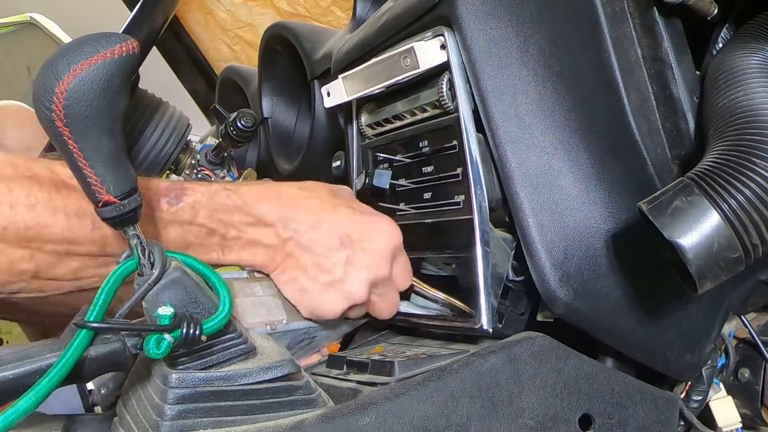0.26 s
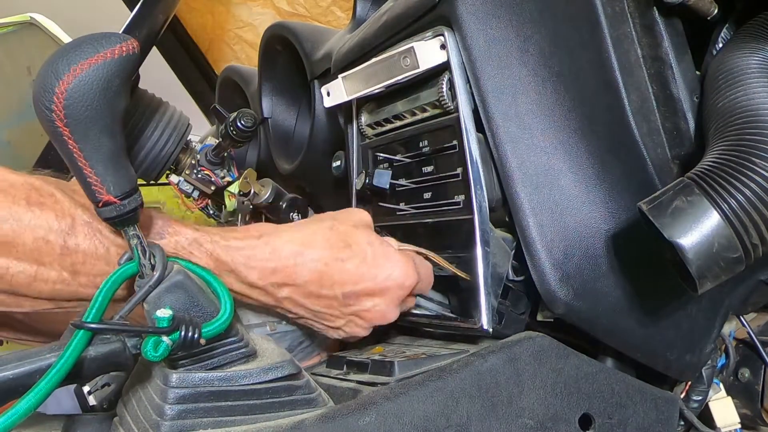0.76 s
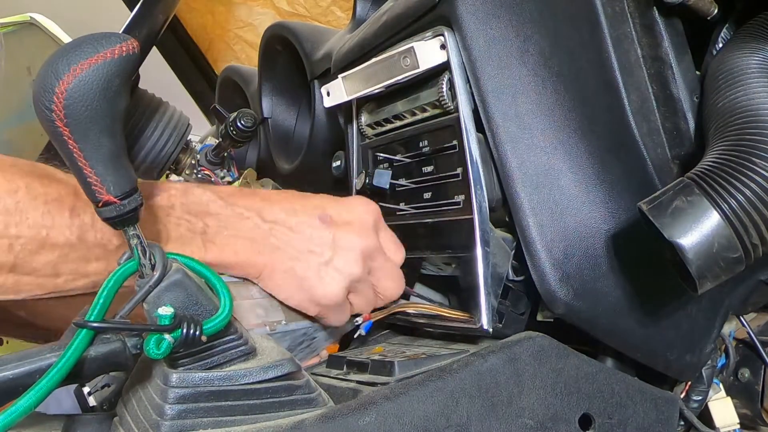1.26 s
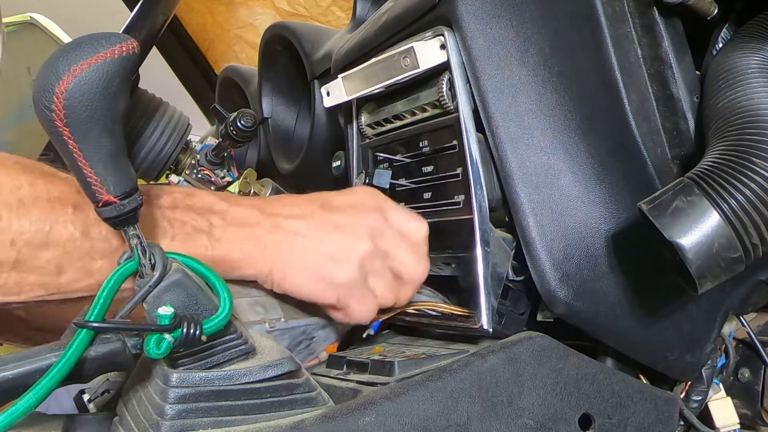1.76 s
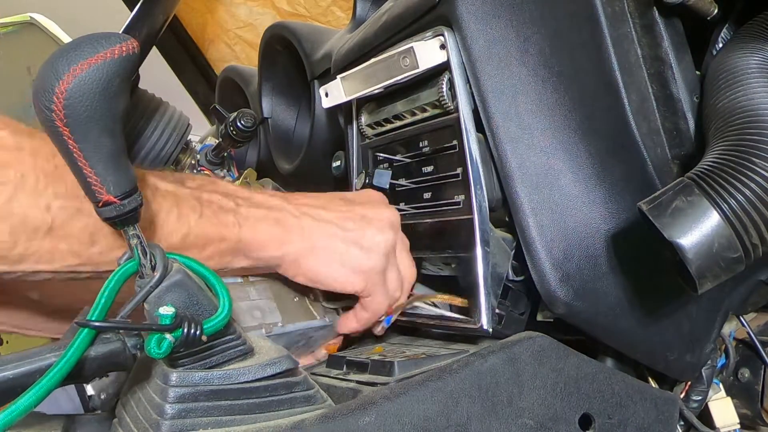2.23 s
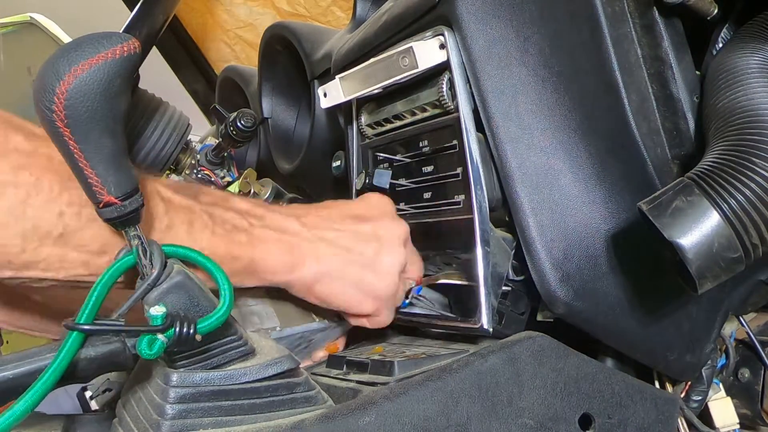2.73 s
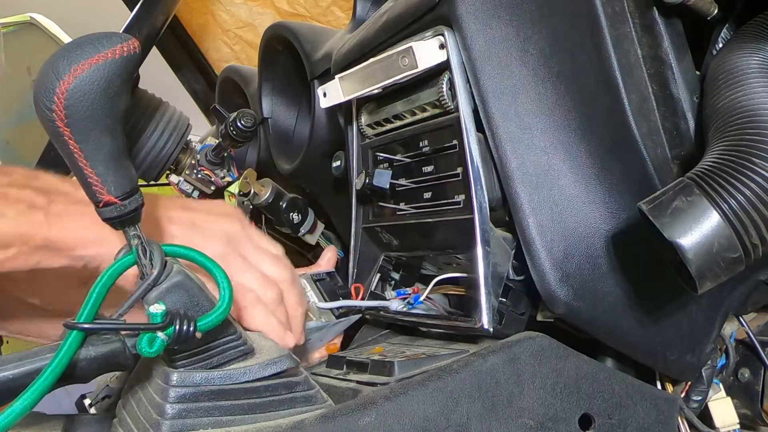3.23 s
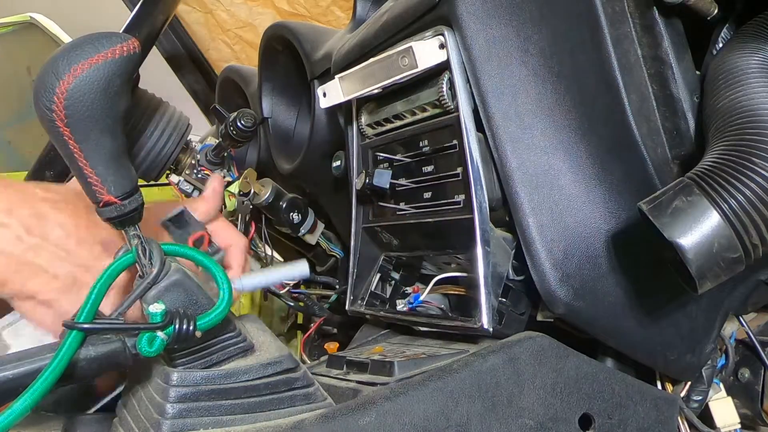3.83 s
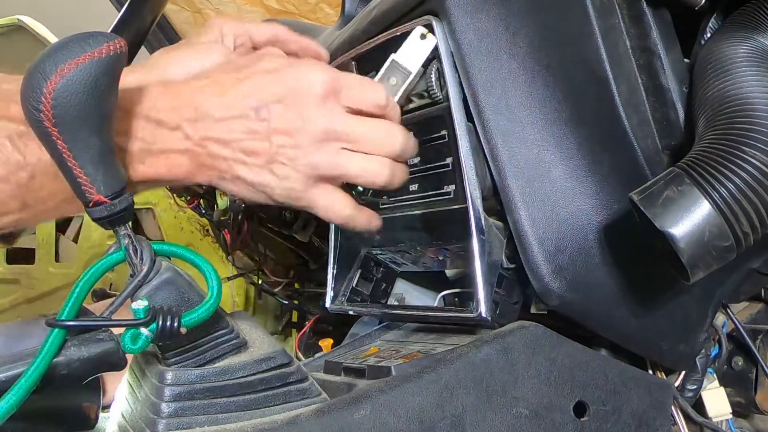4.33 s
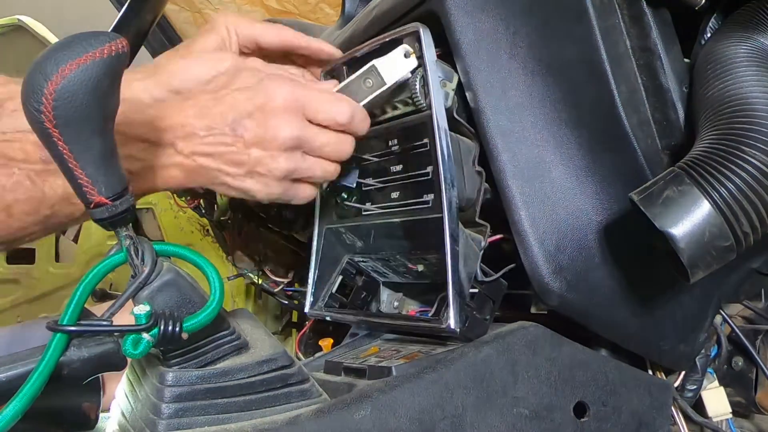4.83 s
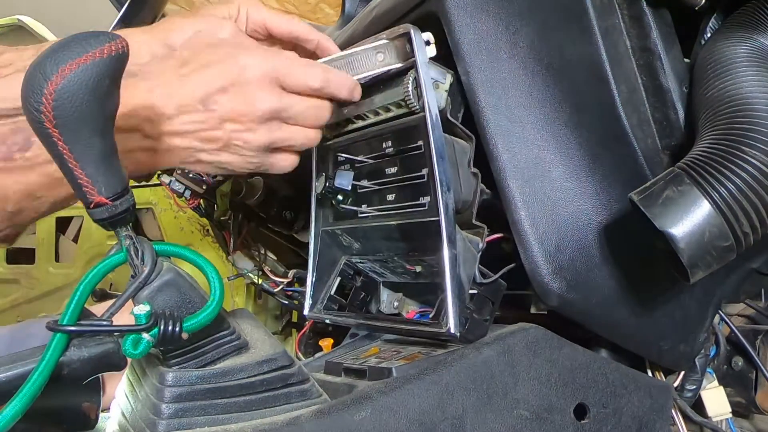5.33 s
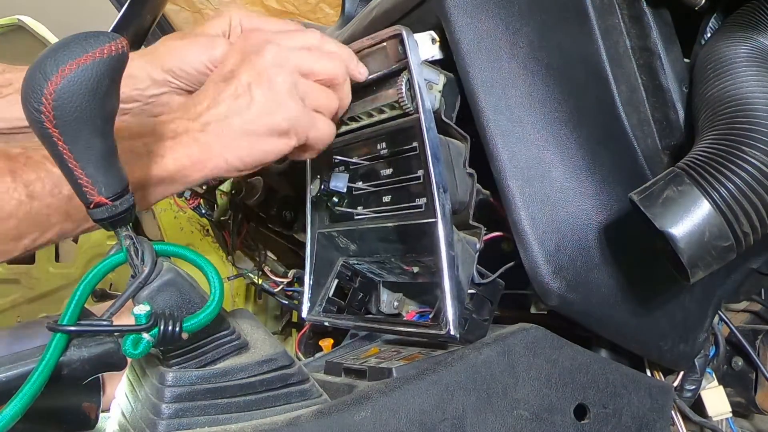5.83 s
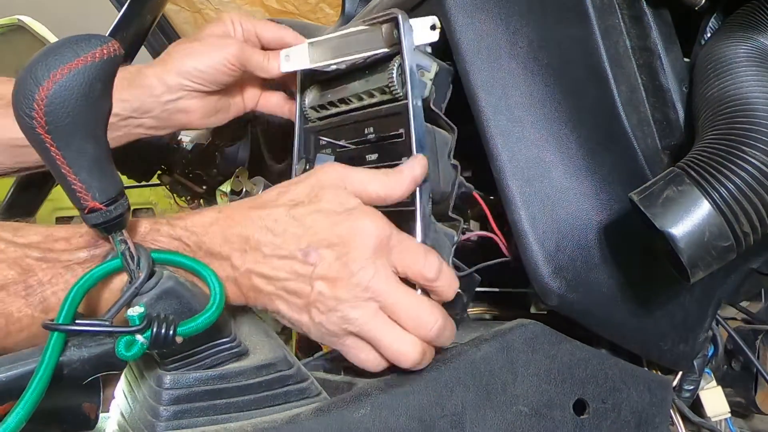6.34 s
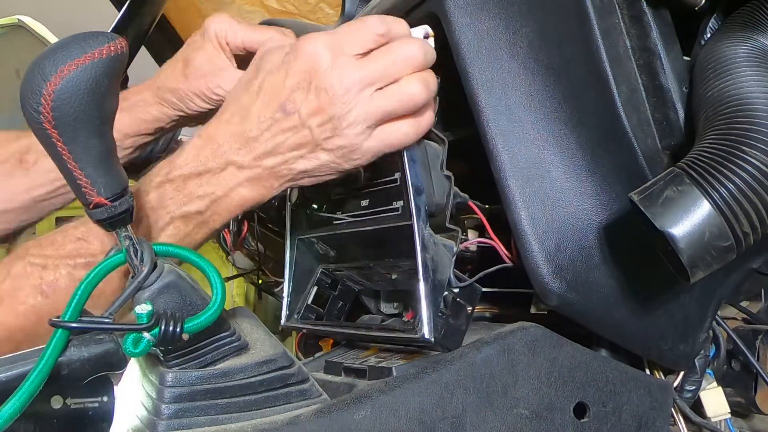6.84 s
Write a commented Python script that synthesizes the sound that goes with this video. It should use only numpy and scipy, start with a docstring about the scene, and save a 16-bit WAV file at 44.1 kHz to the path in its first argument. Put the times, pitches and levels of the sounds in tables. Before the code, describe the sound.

Small plastic and metal pieces tick and snap as someone fiddles with wires and a tool inside a dashboard. The activity thins to faint clicks, then picks up with crisp rattles, tiny ringing squeaks and dull hollow bumps. A short quieter moment follows before a loose plastic panel is shifted, knocked and scraped almost continuously. The microphone is near, in stereo, with short reflections and very faint garage air.

```python
"""Hands work wires, a tool and a loose plastic housing under a car dashboard, close by in a quiet garage.
First brisk clicks and knocks (noise bursts into resonators, dying shell modes), then from 0.6 s sparse, fainter
ones; from 2.6 s a burst of clicks and brief tones (gliding sines), then strong knocks and drags (even noise
drives the shell, random slips the small parts) up to 3.8 s; from 4.4 s dense handling, broken by short rests.
Early reflections, a decaying cabin tail and steady coloured noise for the garage air lie under all of it."""
import sys
import numpy as np
from scipy import signal
from scipy.fft import rfft, irfft, next_fast_len
from scipy.io import wavfile
from scipy.ndimage import uniform_filter1d

SR = 44100
rng = np.random.default_rng(int(sys.argv[2]) if len(sys.argv) > 2 else 0)


def to_wav(s):
    """Save 16-bit WAV."""
    ch = np.atleast_2d(s).T  # columns
    pcm = np.round(np.clip(ch, -1, 1) * 32767)  # PCM
    wavfile.write(sys.argv[1], SR, pcm.astype(np.int16))


N = 312669

# Modes of the hollow dash shell, lower and upper: (frequency [Hz], level [dB], t60 [s])
LOW_SHELL_MODES = [(166.4, -9.5, 0.12), (201.2, -3, 0.087), (227.6, 4.5, 0.14), (253, -1, 0.16),
                   (299.5, -4.5, 0.12)]
UPPER_SHELL_MODES = [(353.5, -7, 0.073), (368.4, -4.5, 0.063), (435, 1.5, 0.033), (519.7, 1.5, 0.02),
                     (666, -4.5, 0.026), (726, -13, 0.047), (830, -11, 0.026), (983, -13, 0.019)]
# Resonances of small plastic and metal parts, one list each for the dull, middle and bright range:
# (frequency [Hz], width [Hz], level [dB])
PART_RESONANCES = [
    [(1380, 670, -6), (1900, 835, 10.5), (2150, 275, -4), (2475, 1150, 14), (3200, 530, -4)],
    [(3800, 1065, 5), (4390, 730, -4.5), (5200, 927, 5), (6220, 1630, 7), (7125, 1550, 10)],
    [(8050, 1640, 7.5), (9370, 1280, 2), (10400, 1640, 8), (12400, 2440, 12.5), (14450, 2270, 11),
     (14970, 1970, 9)],
]


def gain_of(db):
    """Decibel law: amplitude ratio of a level in dB."""
    return 10 ** (np.asarray(db) / 20)


def evened(x):
    """Normalisation by power: scales a signal to rms 1."""
    return x / np.sqrt(np.mean(x ** 2) + 1e-20)


def read(points, hz):
    """Interpolation on a logarithmic frequency axis of a (frequency, value) curve."""
    f, value = np.transpose(points)
    return np.interp(np.log(hz + 1), np.log(f + 1), value)


def add(mix, s, sound):
    """Superposition: adds a sound into the mix from time s [s]."""
    part = mix[max(round(s * SR), 0):][:len(sound)]
    part += sound[:len(part)]


def colour(x, points):
    """Linear filtering: multiplies the spectrum by a (frequency [Hz], gain [dB]) curve."""
    size = next_fast_len(x.shape[-1])
    gain = gain_of(read(points, np.fft.rfftfreq(size, 1 / SR)))
    return irfft(rfft(x, size) * gain, size)[..., :x.shape[-1]]


def rings(modes, t, touch):
    """Modal superposition: exponentially dying sines, each weighted by where the body is struck."""
    hz, db, t60 = np.transpose(modes)[:, :, None]
    decay = gain_of(db - 60 * t / t60)
    return (touch[:, None] * decay * np.sin(2 * np.pi * hz * t)).sum(0)


def part_modes(peaks):
    """Bandwidth and decay: a resonance of width B rings for t60 = ln(1000) / (pi B)."""
    return [(hz, db, np.log(1000) / np.pi / width) for hz, width, db in peaks]


def near(modes, hz, octaves, lift_db):
    """Selective excitation: gain per mode, a bell over log frequency that favours modes close to hz."""
    distance = np.log2(np.array(modes)[:, 0] / hz) / octaves
    return gain_of(lift_db * np.exp(-distance ** 2))


def wander(seconds):
    """Low-pass noise: white noise averaged twice over a window, rms 1."""
    window = int(seconds * SR)
    return evened(uniform_filter1d(uniform_filter1d(rng.standard_normal(N), window), window))


def clicks(build_s=0.0017, spread_db=4.0, shell_db=-12.5, tick_db=-4.5, own_db=(-14., -9., -9.), own_q=7.7):
    """Source and resonator: a sharp tick and edge chatter ring the small parts, each time at another spot."""
    # Hard edges meeting or skidding: (time [s], level [dB], dull range re level [dB], bright range re level [dB],
    # favoured dull frequency [Hz], favoured bright frequency [Hz], chatter t60 [s])
    edge_hits = [(0.014, -43, -7, -25, 1340, 4030, 0.025), (0.0551, -37.5, 0.5, -1, 2300, 3800, 0.034),
                 (0.077, -27, -1, -6, 1960, 6700, 0.024), (0.1, -34.5, -3.5, -8, 1450, 4400, 0.054),
                 (0.1214, -31, -2.5, -7, 1510, 4160, 0.021), (0.175, -28, -7.5, -8.5, 1510, 4100, 0.023),
                 (0.236, -29.5, -5.5, -9, 1870, 4930, 0.016), (0.3477, -40.5, 0, -3, 3180, 4380, 0.045),
                 (0.374, -24.5, -5.5, 1.5, 1740, 5770, 0.023), (0.3853, -30, -1, 1, 2000, 7000, 0.02),
                 (0.395, -28, -1, -4, 2660, 4830, 0.024), (0.5531, -26, -5, -11.5, 1700, 4170, 0.016),
                 (0.8902, -44.5, -2.5, -5, 2270, 6800, 0.011), (0.9172, -46, 3.5, 8.5, 1820, 11300, 0.055),
                 (0.99, -51, -3.5, 1, 1900, 4260, 0.036), (1.059, -44.5, -2.5, 2, 3050, 4170, 0.021),
                 (1.124, -49, -4, -3, 2150, 4930, 0.05), (1.149, -48.5, 6, 1.5, 2190, 7000, 0.015),
                 (1.256, -64, 4, -4.5, 2150, 4230, 0.016), (1.291, -61, 4, -9.5, 2150, 4200, .015),
                 (1.332, -31.5, -17.5, 3, 2300, 6400, 0.035), (1.4269, -37, -14.5, 8.5, 2280, 8300, 0.044),
                 (1.46, -49.5, -1.5, 6, 2250, 4250, 0.039), (1.52, -40.5, -6.5, 2, 3200, 13100, 0.022),
                 (1.5728, -48.5, 0.5, -2, 2200, 6940, 0.013), (1.5884, -43, -6.5, 2, 2130, 5030, 0.058),
                 (1.6154, -45, -3, 9, 3400, 13700, 0.064), (1.716, -44, -2.5, -4, 1880, 6800, 0.039),
                 (1.732, -31, -5.5, -6, 1760, 4860, 0.02), (1.805, -34, -1.5, -3, 3030, 4060, 0.024),
                 (1.82, -37, 0.5, -1, 1760, 4400, 0.02), (1.8382, -31.5, -6, -8, 1750, 4640, 0.018),
                 (1.872, -43, -5, -11, 2150, 6880, 0.017), (1.9104, -26.5, -6, -11.5, 3100, 4770, 0.017),
                 (1.9748, -45.5, 3.5, -2, 3300, 14900, 0.025), (2.1554, -41.5, -39, 2, 3100, 7420, 0.014),
                 (2.1987, -31, -4.5, -4.5, 1800, 4470, 0.044), (2.284, -54, 7, -6, 1960, 4700, 0.013),
                 (2.345, -39.5, -5, 7.5, 3200, 9550, 0.021), (2.407, -44.5, 6, -4, 1850, 4800, 0.017),
                 (2.4541, -29.5, -10, -1.5, 3200, 6700, 0.019), (2.509, -41, 5, 1, 1760, 5200, 0.058),
                 (2.5859, -33.5, 3.5, -1, 1700, 6400, 0.041), (2.598, -33.5, -1, 2, 1700, 9800, 0.019),
                 (2.627, -44, 2, 13, 1580, 9400, 0.018), (2.646, -27.5, -2, 8.5, 3010, 9200, 0.044),
                 (2.6669, -25, -30, 6, 2850, 10400, 0.025), (2.681, -31.5, -9, 6, 2850, 9500, 0.02),
                 (2.699, -34, 0.5, 3, 3420, 12700, 0.035), (2.7267, -36.5, -1.5, 12.5, 3030, 12400, 0.016),
                 (2.759, -39, -4, -1, 1670, 3600, 0.036), (2.7904, -41, 1.5, 1, 1510, 3930, 0.043),
                 (2.812, -43, -2, 3, 1900, 9100, 0.015), (2.846, -41, 3, 0, 3200, 6800, 0.021),
                 (2.8695, -39.5, -10, 3, 2310, 4630, 0.023), (2.884, -39, -2, 0, 2300, 8000, 0.02),
                 (2.897, -35.5, -3, 8, 3100, 12400, 0.023), (2.9118, -36.5, 3, -10, 1850, 6900, 0.019),
                 (2.95, -35.5, -10, -1, 1900, 6500, 0.037), (3.021, -28, -3.5, 8, 1870, 13500, 0.033),
                 (3.092, -45, -4, 3, 3200, 7760, 0.054), (3.129, -41, -19, 3, 3310, 9900, 0.064),
                 (3.163, -30, -2, -2.5, 1420, 9700, 0.047), (3.175, -23.5, -1.5, -8, 2120, 4560, 0.022),
                 (3.205, -36.5, 0, -12, 1580, 4030, 0.035), (3.289, -39, 4, -8, 1430, 3800, 0.04),
                 (3.3358, -35, -2, -34, 1700, 4380, 0.016), (3.357, -32.5, -3, -8, 1980, 6760, 0.024),
                 (3.37, -33.5, 2, -2, 1710, 4360, 0.022), (3.466, -35, 0, 2.5, 3540, 3520, 0.065),
                 (3.5677, -26, 7, -1, 1760, 3600, 0.0096), (3.599, -26.5, -12.5, 5, 1290, 6700, 0.039),
                 (3.74, -35.5, -5, -11, 2000, 4390, 0.018), (3.754, -29, -1, -4, 1380, 8050, 0.025),
                 (3.8081, -34.5, 1, -1.5, 1950, 4000, 0.025), (3.915, -32, -5.5, -7, 1440, 4570, 0.021),
                 (4.025, -47.5, -30, 9, 2620, 13600, 0.059), (4.084, -52, -3, 4, 2500, 7090, 0.036),
                 (4.1378, -33.5, -0.5, -6, 1430, 4400, 0.017), (4.375, -46, -1, 7, 2000, 12000, 0.016),
                 (4.4315, -48, 1.5, 1, 2100, 9500, 0.023), (4.524, -44.5, 8, -1, 1940, 6500, 0.052),
                 (4.5542, -31.5, 9, 4, 1780, 10000, 0.068), (4.589, -34, 5, 5.5, 2320, 4800, 0.041),
                 (4.612, -39.5, 3.5, 6, 1530, 4350, 0.03), (4.667, -32, 2, 4.5, 1640, 3500, 0.044),
                 (4.7, -26, -1, -0.5, 2010, 3760, 0.025), (4.7324, -35, -1, 5, 3020, 8600, 0.015),
                 (4.7609, -35, 6, 3.5, 1800, 7500, 0.038), (4.809, -38, -7, 1, 2720, 5900, 0.025),
                 (4.824, -39, -5.5, -3, 2680, 7800, 0.029), (4.888, -41.5, 0, 1.5, 2100, 3800, 0.054),
                 (4.9149, -26.5, 0.5, -10, 2060, 6470, 0.026), (4.972, -32.5, -4.5, -7, 1900, 3520, 0.02),
                 (5.003, -38.5, -1.5, 2, 3400, 7950, 0.029), (5.0397, -45.5, -11, -7, 3200, 7160, 0.055),
                 (5.15, -19.5, -16, 2.5, 1800, 6680, 0.025), (5.18, -43, 3, 1, 2050, 5200, 0.047),
                 (5.208, -48, -9, 7, 2160, 8550, 0.026), (5.2808, -47.5, 10.5, 11, 2150, 8500, 0.037),
                 (5.294, -42.5, -4, 7.5, 2150, 9900, 0.03), (5.342, -46, 6.5, -18, 2800, 5170, 0.043),
                 (5.393, -44.5, -6, 4, 2000, 9500, 0.051), (5.4145, -27, 1, 0.5, 2250, 5570, 0.021),
                 (5.519, -46, 5, -1.5, 2420, 5220, 0.053), (5.5338, -26.5, -3.5, -1.5, 3400, 4700, 0.025),
                 (5.599, -53, 7.5, -5, 1970, 11000, 0.024), (5.6284, -41, 2, -3, 2130, 5700, 0.046),
                 (5.6498, -25.5, 3.5, 2.5, 2640, 4450, 0.02), (5.7482, -36, -11, -14, 1870, 4260, 0.021),
                 (5.795, -26.5, -10.5, 4, 2070, 11400, 0.023), (5.8716, -42, -11, 1.5, 1840, 9400, 0.033),
                 (5.892, -34.5, -4, -6.5, 1840, 4220, 0.057), (5.992, -42, -2.5, -1, 2150, 3530, 0.02),
                 (6.022, -46.5, 6, 1.5, 1840, 4560, 0.038), (6.129, -35.5, 1.5, 1, 2620, 9100, 0.03),
                 (6.189, -36.5, 0.5, 1.5, 2550, 8100, 0.052), (6.245, -32, 0, -6.5, 1900, 3500, 0.044),
                 (6.2841, -39, 3, -7, 1900, 3700, 0.054), (6.2992, -27.5, -2.5, -4.5, 2950, 5800, 0.035),
                 (6.316, -34, 4, -3, 2530, 4500, 0.029), (6.3592, -40, 2, -23, 1900, 6100, 0.02),
                 (6.3704, -29.5, 1, 5.5, 2010, 8500, 0.045), (6.418, -40, 2, -2, 2860, 5750, 0.027),
                 (6.48, -33, -7, 1, 3200, 4970, 0.01), (6.484, -25, -23, -4, 3420, 3930, 0.012),
                 (6.502, -41, -9.5, 6, 2500, 7800, 0.016), (6.511, -40, 5, -14, 3000, 4000, 0.012),
                 (6.5212, -31.5, -6, 2, 3180, 7500, 0.0075), (6.558, -34.5, -1, 3, 1900, 7600, 0.043),
                 (6.783, -35.5, 4, -14, 2010, 4100, 0.019), (6.812, -32.5, 0.5, -1, 1380, 4100, 0.025),
                 (6.84, -34.5, -0.5, -2, 1380, 5200, 0.032), (6.931, -40.5, 5, 0, 2170, 4900, 0.069),
                 (6.9692, -35.5, -7, -0.5, 2350, 4200, 0.023), (6.99, -37.5, 0, -4, 3280, 4000, 0.035),
                 (7.0312, -29, -8, -11, 1380, 4040, 0.024), (7.047, -39, 1, -3, 2390, 4770, 0.025)]
    # Short swishes of a part dragged past an edge: the columns of edge_hits, then (hold [s])
    strokes = [(3.918, -40.5, -25, -3.5, 1420, 6296, 0.023, 0.038),
               (4.107, -30.5, -8, -2.5, 1730, 4350, 0.032, 0.021),
               (4.344, -36.5, -1.5, 0, 2590, 6360, 0.033, 0.016)]
    contacts = [(*row, 0) for row in edge_hits] + [*strokes]
    out, t, short = np.zeros(N), np.arange(4000) / SR, np.arange(700) / SR
    chatter = rng.standard_normal((len(contacts), len(t)))
    spot = rng.standard_normal((len(contacts), 3, 8))
    grain_db = 12 * uniform_filter1d(rng.standard_normal(chatter.shape), 24) - 1
    chatter = chatter * gain_of(grain_db)  # the chatter comes in grains
    shell = np.minimum(t / 0.0024, 1) * rings(UPPER_SHELL_MODES, t, np.ones(len(UPPER_SHELL_MODES)))
    shell /= np.linalg.norm(shell)
    for contact, noise, spots in zip(contacts, chatter, spot):
        s, db, dull_db, bright_db, dull_hz, bright_hz, t60, held = contact
        t60 = np.clip(t60, .004, .09)
        build = build_s + held / 4 + 0.14 * max(t60 - .035, 0)  # a long skid swells in
        squareness = 1 + t60 / 0.071  # a long skid holds its level, then stops
        shape = np.sin(np.pi / 2 * np.minimum(t / build, 1))
        shape *= gain_of(-60 * (np.maximum(t - build_s - held, 0) / t60) ** squareness)
        if held == 0:  # strokes have no tick
            shape *= 1 + gain_of(tick_db - 60 * abs(t - build_s) / 0.0058)
        burst = noise * shape
        ranges = zip(PART_RESONANCES, (dull_db, 0, bright_db), (dull_hz, bright_hz, bright_hz), spots, own_db)
        for peaks, part_db, hz, touch, ring_db in ranges:
            peaks = [*peaks, (hz, hz / own_q, ring_db)]  # the piece that is struck adds its own ring
            touch = gain_of(spread_db * touch[:len(peaks)]) * near(peaks, hz, 0.16, lift_db=7.5)
            touch = touch * (-1.) ** np.arange(len(peaks))  # listed neighbours in opposite sign
            ring = short * rings(part_modes(peaks), short, touch)  # the ramp gives a soft start
            ring /= np.linalg.norm(ring)
            add(out, s - .001, gain_of(db + part_db) * signal.fftconvolve(burst, ring))
        passed_on = signal.fftconvolve(burst, shell)  # what reaches the dash shell
        add(out, s, gain_of(db + dull_db + shell_db) * passed_on)
    return out


def knocks(blow_s=0.0082, free_s=.042):
    """Impact excitation: a blow of some ms rings the shell modes until a hand stills them after free_s."""
    # Knocks into the shell: (time [s], level [dB], upper modes re level [dB], favoured frequency [Hz])
    blows = [(0.093, -33, -12, 242.4), (.38, -34.5, 1.5, 266), (.399, -28, 2.5, 272.6),
             (.497, -38.5, 2.5, 318), (.543, -50, 17.5, 253), (.938, -36, 0.5, 237.5),
             (0.959, -53, 16.5, 360), (1.025, -66, 16, 446), (1.15, -63.5, 19, 464),
             (1.202, -64.5, 14, 472), (1.465, -61, 14.5, 447), (1.539, -49, 0, 226),
             (1.623, -40, -0.5, 241.5), (1.738, -32, -5, 244), (1.828, -39.5, 2, 226),
             (1.972, -52.5, 17, 345), (2.2, -40.5, 5, 260), (2.25, -37.5, 2, 242.5),
             (2.414, -41, -4.5, 194), (2.491, -45, 8.5, 256), (2.529, -34.5, 0, 222), (2.6, -31, -0.5, 243),
             (2.653, -34.5, 5, 242), (2.857, -33.5, -10, 225), (2.895, -36, 2.5, 193),
             (3.03, -28, 3.5, 276), (3.172, -30, 9, 186), (3.304, -28, -1, 238), (3.378, -25.5, -9, 223),
             (3.477, -21, -5.5, 243), (3.513, -24.5, -12, 247), (3.58, -24, -5, 281),
             (3.639, -38.5, 9, 242), (3.758, -12.5, -9, 228), (3.914, -44, 7.5, 314), (4.292, -58, 17, 520),
             (4.373, -39.5, 5.5, 317), (4.525, -33.5, -3, 229), (4.68, -18.5, -9, 228),
             (4.766, -41.5, 3.5, 223), (4.799, -34, -8, 238), (4.94, -42, -6, 228), (5.16, -21, -8.5, 227),
             (5.204, -36.5, -16, 230), (5.292, -34.5, -8, 238), (5.308, -26, -18, 226),
             (5.351, -23.5, -9, 229), (5.402, -26.5, -9, 228), (5.531, -24.5, -19, 254),
             (5.56, -25, -21, 237), (5.639, -29.5, 3.5, 227), (5.713, -27, -9, 227),
             (5.771, -35.5, -0.5, 231), (5.798, -22.5, -10, 226), (5.917, -35, -7, 211),
             (6.119, -38, -12, 229), (6.219, -25.5, -1, 240.7), (6.24, -23, -8, 224), (6.266, -33, 9, 238),
             (6.306, -27.5, 4, 200), (6.355, -25.5, 2, 226), (6.385, -27.5, 9.5, 352),
             (6.43, -31.5, 10.5, 350), (6.563, -25.5, -21, 227), (6.606, -36, 1.5, 254),
             (6.666, -32.5, -3, 227), (6.754, -38.5, 0.5, 171), (6.811, -42, 9, 193), (6.903, -33, -3, 200),
             (6.998, -37, 4, 227), (7.055, -30.5, 2.5, 229)]
    # Sharp thumps, three deep ones near 86 Hz and one hard knock of two beating tones:
    # (time [s], level [dB], frequency [Hz])
    thumps = [(2.669, -42, 85), (3.173, -36, 86), (3.751, -35, 87.4), (4.146, -26.5, 273),
              (4.148, -37, 218)]
    out, t = np.zeros(N), np.arange(7000) / SR
    swell = 1 - np.exp(-(t / blow_s) ** 2)
    swell *= gain_of(-60 * np.maximum(t - free_s, 0) / 0.034)
    spot = gain_of(3 * rng.standard_normal((len(blows), 8)))
    for (s, db, upper_db, hz), touch in zip(blows, spot):
        low_touch = near(LOW_SHELL_MODES, hz, 0.086, lift_db=20.0)
        upper_touch = touch[:len(UPPER_SHELL_MODES)] * near(UPPER_SHELL_MODES, hz, 0.097, lift_db=15.5)
        for modes, part_db, weights in ((LOW_SHELL_MODES, 0, low_touch), (UPPER_SHELL_MODES, upper_db, upper_touch)):
            sound = swell * rings(modes, t, weights)
            add(out, s - .008, gain_of(db + part_db) * sound / abs(sound).max())
    out = stilled(out)
    for s, db, hz in thumps:
        add(out, s, gain_of(db - 60 * t / 0.12) * np.sin(2 * np.pi * hz * t))
    return out


def singing(rough=0.51, cycles=5, skew=0.68):
    """Single-mode tone: a gliding sine swells and fades, its two quadratures unsteady over a few cycles."""
    # Brief tones: small parts sing as they are struck, bent or skid, and the shell rings after knocks:
    # (time [s], level [dB], first frequency [Hz], last frequency [Hz], length [s])
    tones = [(0.188, -55, 596, 580, .045), (0.233, -30.5, 1900, 1900, 0.0086),
             (0.262, -52, 4300, 4530, 0.1), (2.666, -29.5, 312, 292, 0.053), (3.018, -30, 594, 327, 0.042),
             (3.021, -33, 1810, 1800, 0.011), (3.177, -19, 420, 380, 0.0097), (3.184, -26, 235, 250, .055),
             (3.547, -27, 1930, 1850, .016), (3.562, -12.5, 1770, 1680, 0.012),
             (3.566, -32, 734, 710, 0.025), (4.109, -29, 1843, 1650, 0.02),
             (4.11, -28.5, 4410, 4220, 0.017), (4.108, -33.5, 3160, 2790, .02),
             (4.124, -40, 1516, 1270, .024), (5.412, -22, 2450, 2350, .01), (5.531, -26, 5250, 5270, 0.011),
             (5.63, -34, 2040, 2000, 0.017), (5.63, -41, 2820, 2780, .016), (5.65, -26, 4320, 4240, 0.0073),
             (6.242, -32, 1855, 1900, 0.015), (6.283, -38, 1900, 1900, 0.012),
             (6.368, -27, 2020, 1880, .016), (6.412, -16, 230, 224, .055), (6.415, -31, 2770, 2750, 0.019),
             (6.424, -32, 2150, 2130, 0.01), (6.483, -24, 4350, 4320, 0.0042),
             (6.521, -32.5, 3270, 3200, 0.0087), (6.534, -39, 3260, 3250, .022),
             (6.562, -39, 1890, 1880, 0.041), (6.571, -36, 3320, 3100, 0.025),
             (7.044, -41.5, 756, 730, 0.018), (7.045, -44, 1130, 1100, 0.012)]
    out = np.zeros(N)
    for (s, db, first_hz, last_hz, length), noise in zip(tones, rng.standard_normal((len(tones), 2, 6000))):
        u = np.arange(0, length, 1 / SR) / length
        smooth = uniform_filter1d(uniform_filter1d(noise, int(cycles * SR / first_hz)), int(SR / first_hz))
        a, b = rough * evened(smooth)[:, :len(u)]
        angle = 2 * np.pi * np.cumsum(first_hz + (last_hz - first_hz) * u) / SR
        swell = np.sin(np.pi * u ** skew) ** 2
        add(out, s, gain_of(db) * swell * ((1 + a) * np.sin(angle) + b * np.cos(angle)))
    return out


def sliding(slips_per_s=1100, size_db=4.2):
    """Friction: an even noisy rub drives the shell, tiny uneven slips the small parts; the contact roams."""
    t, out = np.arange(N) / SR, np.zeros((4, N))
    dull, middle, bright = PART_RESONANCES
    bodies = (LOW_SHELL_MODES, UPPER_SHELL_MODES, part_modes([*middle, *bright]), part_modes(dull))
    slips = gain_of(size_db * np.minimum(rng.exponential(1, N), 5)) * (rng.random(N) < slips_per_s / SR)
    slips = slips * rng.choice([-1., 1.], N) + 0.31 * rng.standard_normal(N)
    drive = evened(slips * gain_of(3.5 * wander(.005)))  # the grip catches and lets go
    rub = evened(rng.standard_normal(N) * gain_of(2 * wander(.008)))
    roam = gain_of(2.5 * wander(.03))
    roam_rms = np.sqrt(np.mean(roam ** 2))
    body_efforts = np.repeat(efforts(t[::32]), 32, axis=1)[:, :N]
    for body, force, effort, modes in zip(out, (rub, rub, drive, drive), body_efforts, bodies):
        push = force * effort / roam_rms
        # two cycles of build-up, at the body's first mode, keep the skirts steep
        soft = np.minimum(t[:5000] * modes[0][0] / 2, 1)
        size = np.linalg.norm(soft * rings(modes, t[:5000], np.ones(len(modes))))
        for k, mode in enumerate(modes):
            # neighbours move in opposition
            ring = soft * rings([mode], t[:5000], np.ones(1)) * (-1) ** k / size
            # a time shift of its own lets each mode come and go
            body += signal.oaconvolve(push * np.roll(roam, rng.integers(N)), ring)[:N]
    low_shell, upper_shell, bright_parts, dull_parts = out
    return stilled(low_shell + upper_shell) + bright_parts + dull_parts


def efforts(t):
    """Addition of powers: fumbling plus shoves, as gains on low shell, upper shell, bright and dull parts."""
    # Light fumbling, before each body's share: (time [s], shell level [dB], small parts level [dB])
    fumbling = [(0.0, -59, -59), (0.407, -77, -60.5), (0.63, -85, -78), (1.54, -72, -73.5),
                (1.74, -48, -67.5), (2.17, -64, -63), (2.63, -50, -62), (3.71, -56, -70), (3.95, -78, -65),
                (4.38, -54, -68), (4.7, -49, -54), (5.11, -71, -65), (5.61, -43.5, -57.5),
                (6.06, -53, -67.5), (6.42, -39, -51), (6.55, -73, -68), (6.77, -58, -56.5),
                (7.09, -58, -56.5)]
    # Share of the fumbling, one column per body: (low shell [dB], upper shell [dB], bright [dB], dull [dB])
    share = (-5.5, -4, 5, 5.5)
    # A part or hand is shoved along; times of swell and fade count by magnitude, 0 being abrupt:
    # (time of most force [s], swell over 20 dB [s], fade over 20 dB [s],
    # low shell drag [dB], upper shell scrape [dB], bright parts rustle [dB])
    shoves = [(.075, 1, 0.22, -60, -48, -51), (.3, 0.5, 0.48, -83, -64, -51.5),
              (0.391, 0, 0.0427, -27, -33.5, -42), (0.565, 0.14, 0, -45, -45, -60),
              (0.924, -0.1, 0.1, -61, -53, -62.5), (1.97, 0.8, -7, -73, -57.5, -78),
              (2.21, 0.16, 0.24, -57, -49, -53), (2.646, 0.09, -0.01, -63, -53, -38),
              (2.674, 0.14, 0.04, -33, -35, -44), (2.92, 0.05, 2, -46.5, -50, -72.5),
              (3.03, -0.18, 0.06, -58, -42, -55), (3.181, 0.15, 0.09, -38, -37.5, -50),
              (3.38, -0.8, 0.35, -52, -54.5, -58), (3.493, -0.7, 0.17, -34.5, -42.5, -47),
              (3.572, 0.06, 0.07, -46, -30.5, -34), (3.751, 0.18, 0.0632, -24, -40.5, -40.5),
              (4.138, 0.17, 0.4, -55, -60, -46.5), (4.38, -0.2, 2.5, -52, -56.5, -63),
              (4.569, 0.06, 0.23, -34, -34, -45), (4.669, 0, 0.2, -60, -42, -45),
              (4.68, 0.36, -0.2, -40, -52, -63), (5.169, 0, 0.14, -45, -47, -49),
              (5.29, 0.37, 0, -59, -47, -50), (5.36, -0.45, 0.05, -42, -50.5, -66),
              (5.53, -0.23, 0.13, -41, -40.5, -39.5), (5.651, -0.4, 0.08, -42, -39.5, -59),
              (5.799, -2.2, 0.11, -37, -49, -61), (6.26, 0.12, -0.1, -36.5, -43, -46),
              (6.42, 0.21, 0.1, -22, -34.5, -48.5), (6.5, 0.57, 0.2, -52, -44.5, -47.5),
              (6.59, -0.25, 0.1, -40, -43, -54), (6.86, 0.15, .06, -50, -37, -45),
              (6.95, -1.5, 4, -42, -62, -67), (7.08, 0.2, -11, -48, -43, -47)]
    dull_part_db = -1.5  # scrape on the dull parts, against that on the upper shell
    s, shell_db, parts_db = np.transpose(fumbling)
    body_db = (shell_db, shell_db, parts_db, parts_db)
    # twice the dB turns an amplitude gain into a power
    power = np.array([gain_of(2 * (np.interp(t, s, db) + share_db)) for db, share_db in zip(body_db, share)])
    for s, swell, fade, drag_db, scrape_db, rustle_db in shoves:
        shape_db = -20 * np.where(t < s, (s - t) / abs(swell), (t - s) / abs(fade))  # even in dB
        peak_db = np.array([drag_db, scrape_db, rustle_db, scrape_db + dull_part_db])
        power += gain_of(2 * (peak_db[:, None] + shape_db))
    return np.sqrt(power) * gain_of(hush(t))


def hush(t):
    """Amplitude envelope: the dB by which moments of rest lower the handling, as flat-bottomed dips."""
    # The hands rest a moment: (middle [s], half length [s], level change [dB])
    rests = [(0.025, 0.014, -2.5), (0.761, 0.11, -31), (1.392, 0.024, -19), (1.491, 0.02, -13),
             (1.68, 0.014, -8), (2.034, 0.036, -15), (2.991, 0.026, -8), (3.117, 0.046, -8),
             (3.247, 0.027, -13), (3.423, 0.036, -11), (3.658, 0.013, -7), (3.703, 0.037, -11.5),
             (3.869, 0.024, -11), (3.987, 0.033, -8.5), (4.057, 0.022, -11), (4.215, 0.097, -10),
             (4.472, 0.024, -10.5), (4.64, 0.011, -7), (4.726, 0.02, -6.5), (4.786, 0.0055, -3),
             (4.842, 0.024, -5), (5.096, 0.045, -15.5), (5.243, 0.019, -12.5), (5.326, 0.012, -12),
             (5.478, 0.036, -13), (5.579, 0.01, -12), (5.613, 0.014, -13), (5.725, 0.0063, -8),
             (5.849, 0.018, -5), (5.962, 0.023, -6), (6.46, 0.018, -25.5), (6.709, 0.043, -6),
             (6.908, 0.023, -13), (7.022, 0.0088, -28)]
    return sum(db * np.exp(-((t - s) / half) ** 4) for s, half, db in rests)


def stilled(x, lag_s=.012, share=0.64):
    """Damping by touch: a resting hand lowers the shell a little later, by a share of the rest's dB."""
    damping_db = share * hush(np.arange(0, N, 32) / SR - lag_s)
    return x * np.repeat(gain_of(damping_db), 32)[:N]


def reflections(x, t60, half_turns_per_s=9):
    """Time-varying early reflections: three decaying sets fade into one another at a steady rate."""
    t, turn = np.arange(1500) / SR, np.pi * half_turns_per_s * np.arange(N) / SR
    early = rng.standard_normal((3, len(t))) * gain_of(-60 * t / t60)
    fades = np.sqrt(2 / 3) * np.cos(turn + np.pi / 3 * np.arange(3)[:, None])  # constant total power
    return signal.oaconvolve(x * fades, early / np.linalg.norm(early[0]), axes=1).sum(0)[:N]


def tail(start):
    """Reverberant decay: sparse echoes of random sign from sample start, each band at its own t60, energy 1."""
    # Decay of the cabin: (frequency [Hz], t60 [s])
    cabin = [(200, 0.019), (600, 0.27), (1500, 0.12), (4000, 0.13), (10000, 0.13)]
    taps = np.zeros(SR // 3)
    at = np.arange(start, len(taps) - 12, 12)
    taps[at + rng.integers(0, 12, len(at))] = rng.choice([-1., 1.], len(at))
    hz, t, z = signal.stft(taps, SR, nperseg=256)
    decay = gain_of(-60 * t / read(cabin, hz)[:, None])
    out = signal.istft(z * decay, SR, nperseg=256)[1]
    return out / np.linalg.norm(out)


def surroundings(close):
    """Diffuse field: the side signal, early reflections and a cabin tail shaped by frequency."""
    # Level of the side signal: (frequency [Hz], gain [dB])
    width = [(60, -4), (150, -18), (600, -21), (1200, -12), (2200, -7), (5000, -1.5), (7500, -11),
             (15000, -13.5)]
    late = gain_of(-9.0) * signal.oaconvolve(close, tail(150))[:N]
    return colour(reflections(close, 0.0093) + late, width)


def garage_air(level_db=-68.5, side_db=-5.0):
    """Stationary background noise: coloured Gaussian noise, independent in mid and side."""
    # Spectrum of the quiet garage, relative: (frequency [Hz], level per Hz [dB])
    spectrum = [(30, -0.5), (53, -14.5), (90, -5.5), (119, -13), (235, -12), (326, -15), (574, -6.5),
                (888, -22), (1150, -19.5), (1710, -15.5), (2370, -3), (3080, -16), (16500, -24)]
    air = colour(rng.standard_normal((2, N)), spectrum)
    return gain_of(level_db) * air / np.std(air[0]) * gain_of([[0], [side_db]])


def scene(cabin_db=-15):
    """Mid-side stereo: close sound and cabin tail in the middle, reflections and tail as the side signal."""
    close = clicks() + singing() + knocks() + sliding()
    mid = close + gain_of(cabin_db) * signal.oaconvolve(close, tail(150))[:N]
    side = surroundings(close)
    mid_air, side_air = garage_air()
    mid, side = mid + mid_air, side + side_air
    return np.array([mid + side, mid - side])


def record(dry, edge_hz=16200):
    """Transducer response: the microphone weakens the bass and the range above 1.5 kHz; a low-pass follows."""
    # Response of the microphone: (frequency [Hz], gain [dB])
    response = [(20, -19.5), (60, -8.5), (110, -6), (160, -1.5), (220, -9), (800, 0.5), (1050, 2),
                (1500, -10), (16000, -11)]
    edge = signal.firwin(255, edge_hz, window=("kaiser", 8), fs=SR)
    return signal.oaconvolve(colour(dry, response), edge[None], "same")


dry = scene()
out = record(dry)
to_wav(out)
```